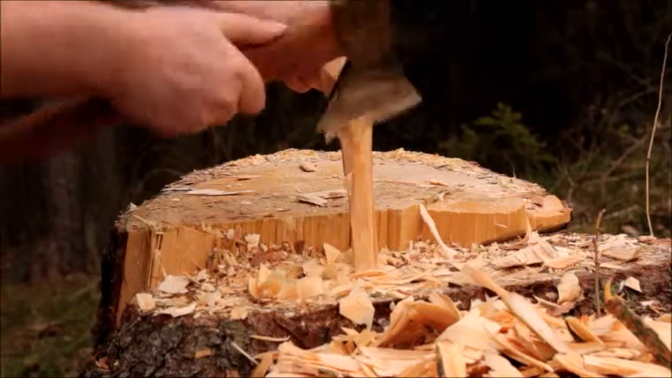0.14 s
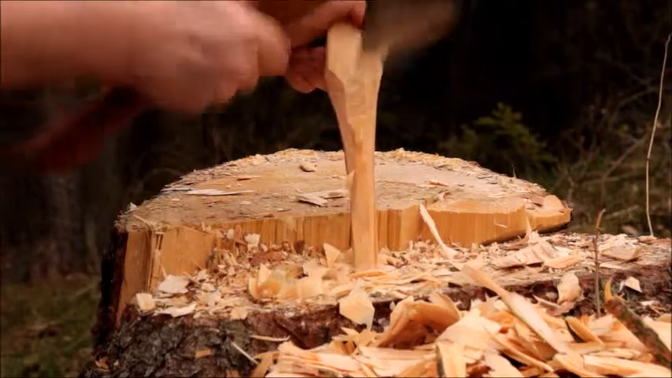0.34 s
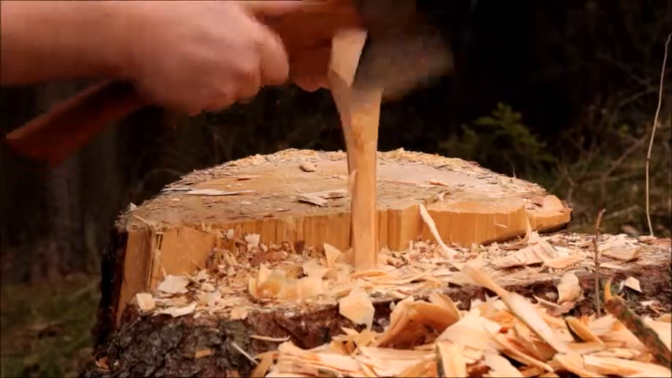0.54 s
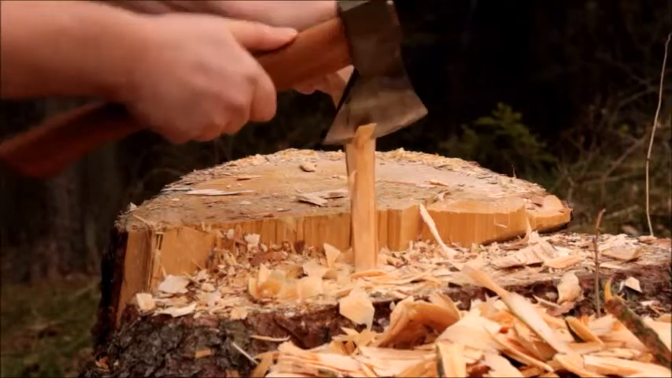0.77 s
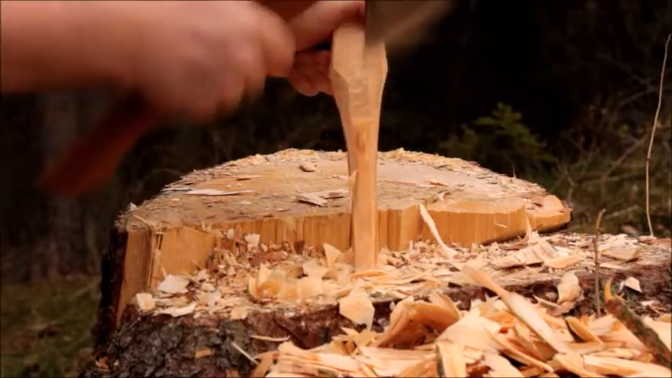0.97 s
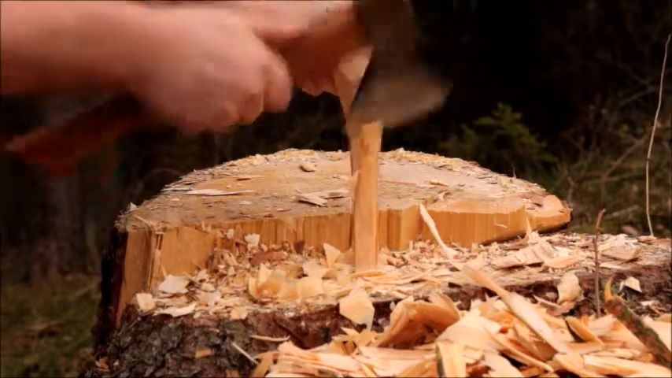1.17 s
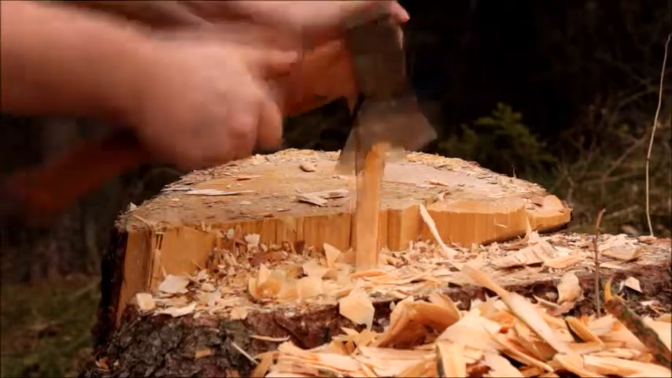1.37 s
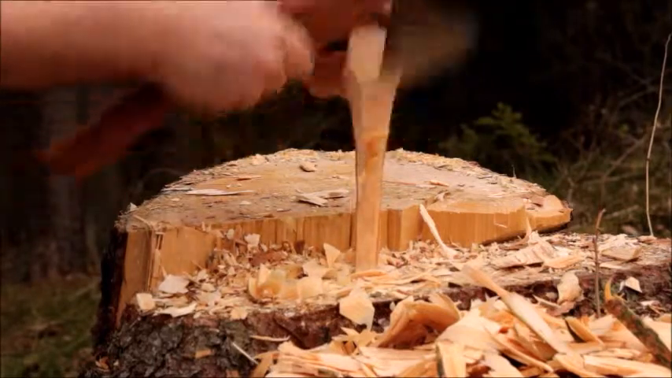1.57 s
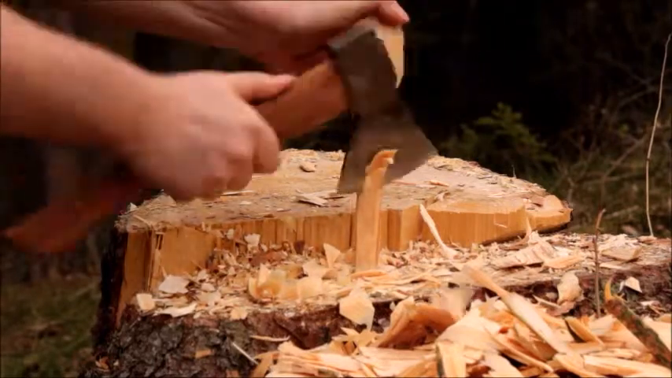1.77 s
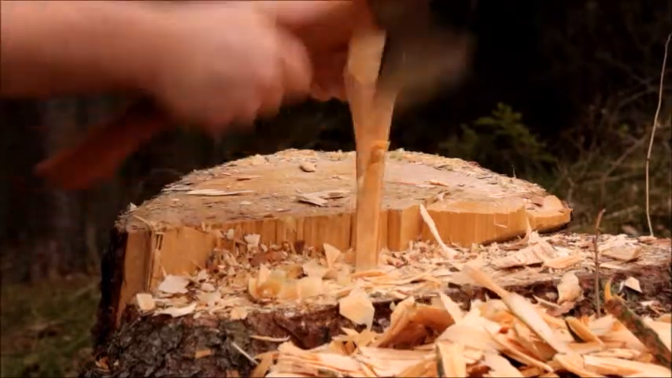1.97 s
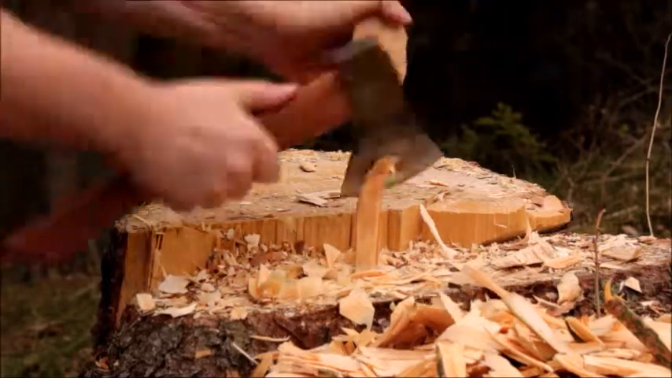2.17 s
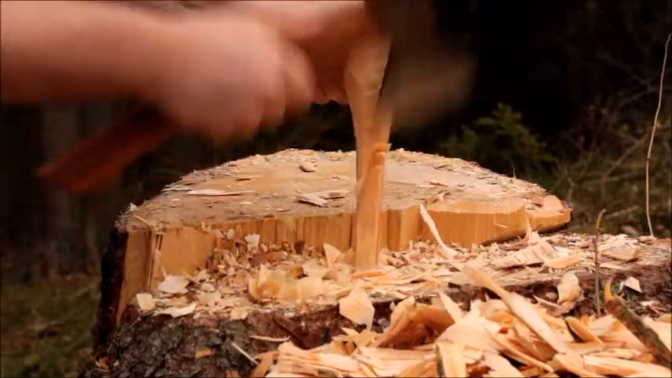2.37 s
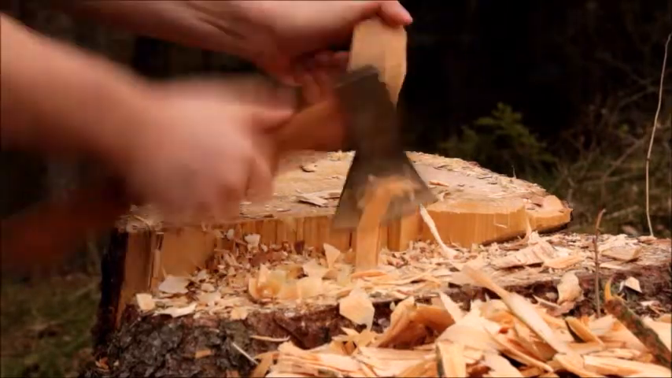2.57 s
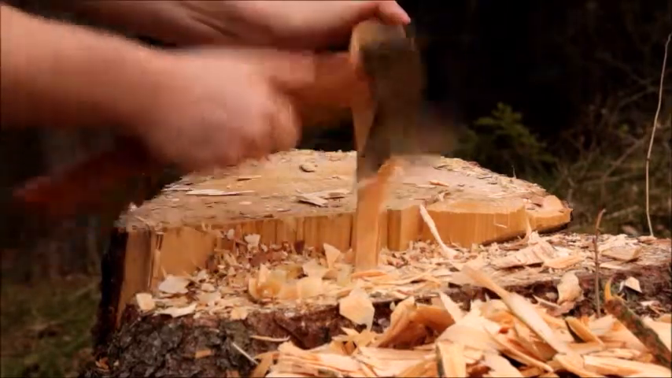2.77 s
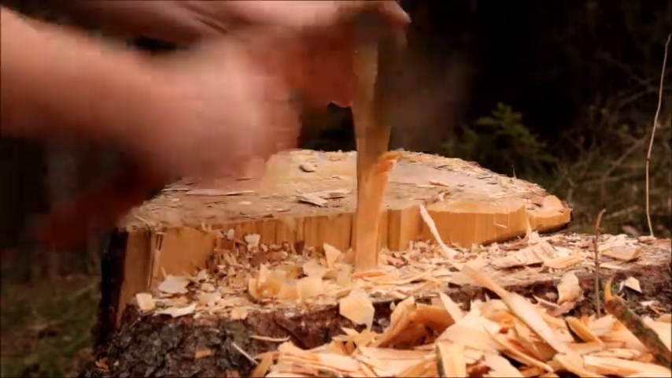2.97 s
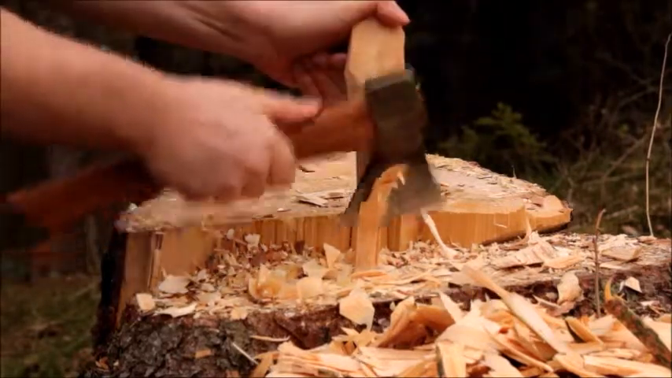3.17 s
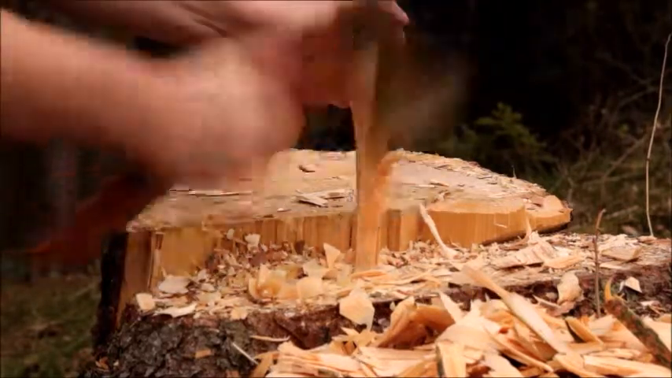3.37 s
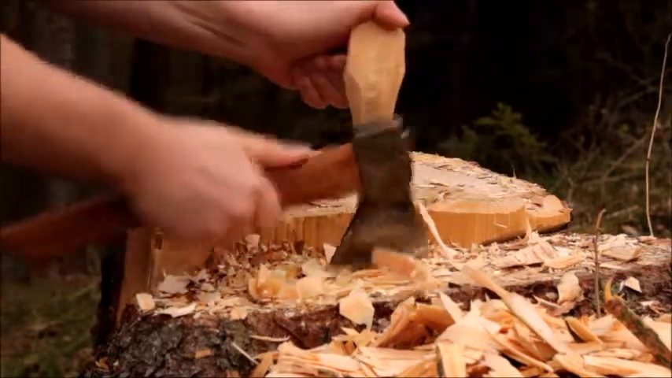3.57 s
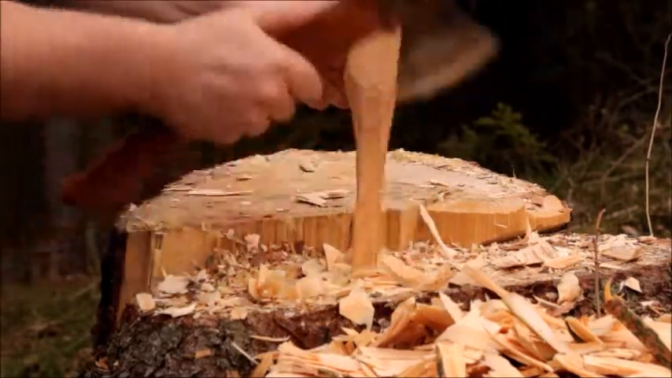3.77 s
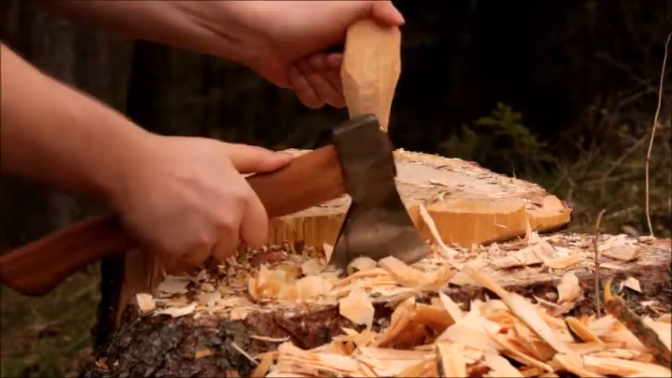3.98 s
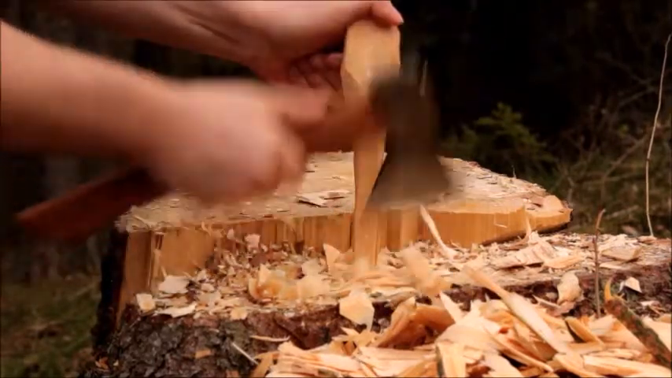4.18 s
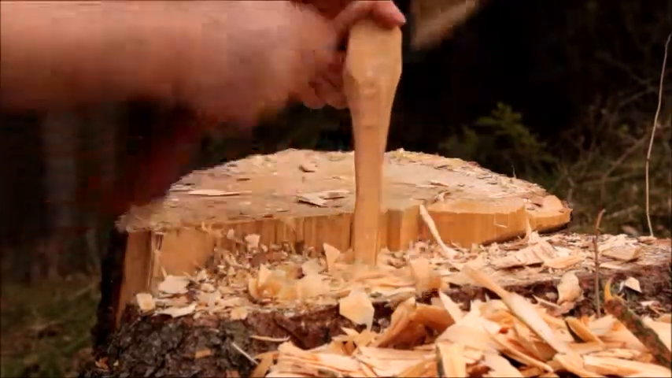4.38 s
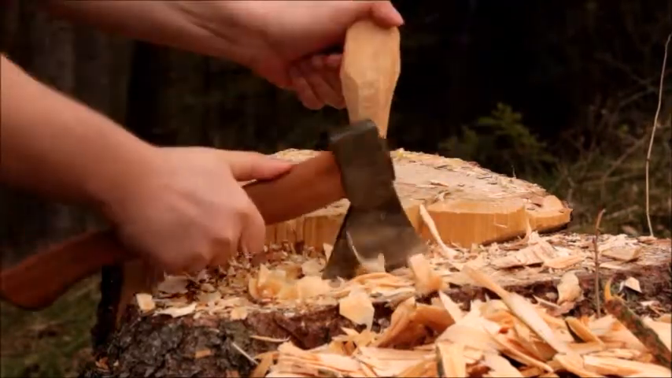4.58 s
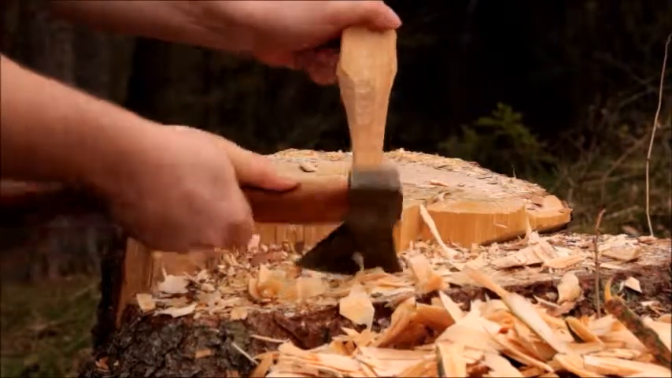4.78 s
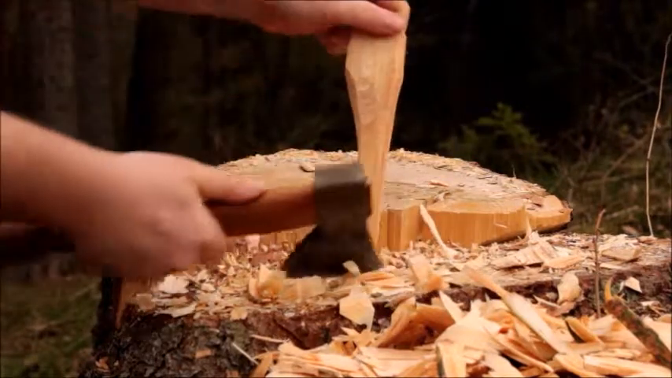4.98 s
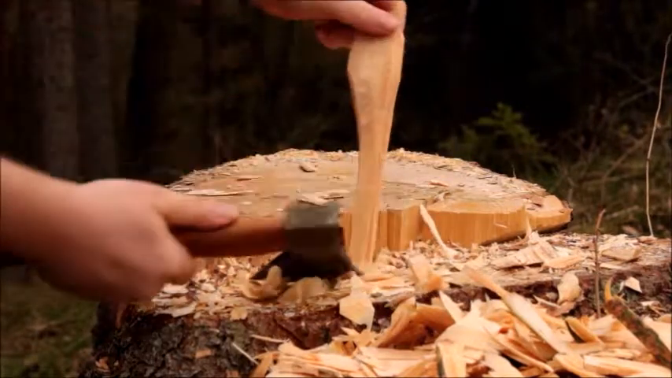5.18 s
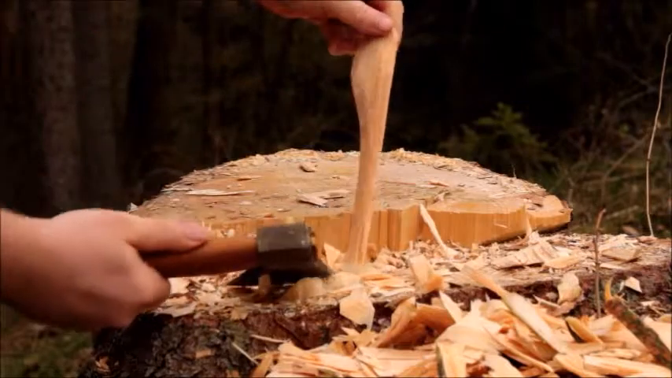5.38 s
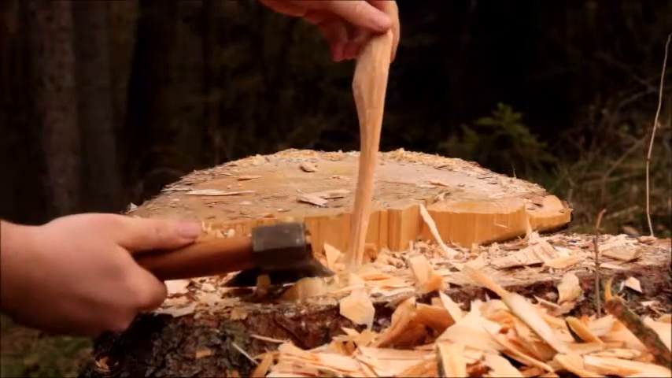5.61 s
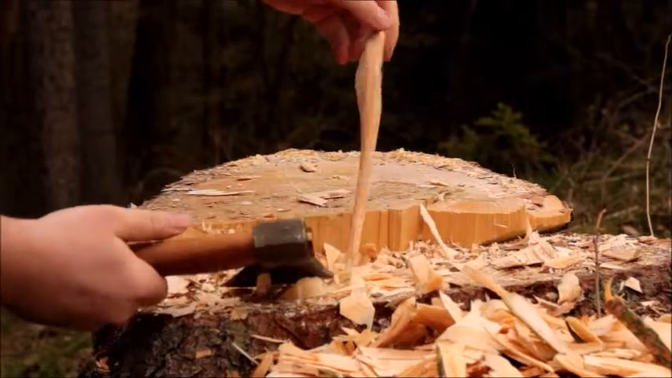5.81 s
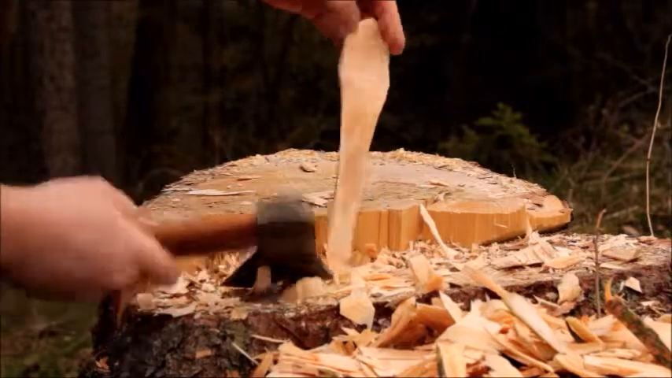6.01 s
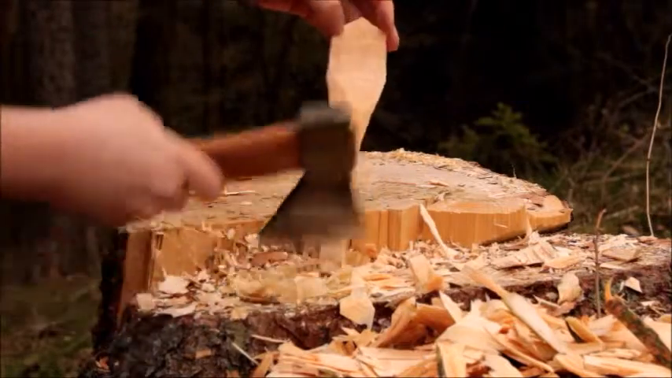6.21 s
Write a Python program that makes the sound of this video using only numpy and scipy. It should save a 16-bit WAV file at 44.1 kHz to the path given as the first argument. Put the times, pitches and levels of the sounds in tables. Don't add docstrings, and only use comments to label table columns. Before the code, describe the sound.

A quiet forest, with soft wind in the crowns, slight microphone hiss and a blurred far bird chorus. Very close and dry, a small axe chops a wooden blank on a stump at roughly 0.1, 0.4, 0.7, 1.1, 1.4, 1.8, 2.2, 2.6, 3.1, 3.5, 4.0 and 4.5 seconds. Early strokes are hollow, bright knocks with short steel rings and a faint woody hum. Fibres tear and chips snap, most sharply near 2.6. From 3.5 the blows gain a lower second knock and a dull stump thud, strongest near 4.0. A tit whistles high alternating rising and falling notes until about 1.6, then again from 4.1 to the end, echoing among trunks. Faint single whistles come from farther birds. Light low wind puffs touch the microphone around 3.7 to 4.9. After the last blow, a thin, high friction whine wavers from 4.9 to 5.5; birdsong and air remain until 6.2, the background briefly thinning at moments.

```python
import sys
import numpy as np
from scipy import signal
from scipy.io import wavfile
from scipy.ndimage import uniform_filter1d, map_coordinates

SR = 44100
rng = np.random.default_rng(int(sys.argv[2]) if len(sys.argv) > 2 else 0)


def invert_db(x):
    u = np.asarray(x, float) / 20
    return 10 ** u


def materialize(psi):
    bounded = np.clip(np.atleast_2d(psi).T, -1, 1)
    quanta = np.round(bounded * 32767).astype(np.int16)
    wavfile.write(sys.argv[1], SR, quanta)


N = 275625

# [t/s, strength/dB]
WIND = [(0, -66.5), (2.6, -66.5), (3.5, -63), (4.2, -65.5), (4.7, -60), (5.3, -68), (6.25, -66)]
# [t/s, level/dB]
CHORUS_BUSY = [(0, -59), (.8, -65.5), (1.35, -64), (1.55, -59.5), (2.2, -58), (2.7, -64.5), (4.5, -66),
               (5.1, -58), (5.6, -63), (6.25, -61)]
# [f/Hz, density/dB]
RUSH_SPECTRUM = [(71, -23), (120, -2), (210, -6), (242, -5), (520, 1), (647, -3), (781, -3), (1310, -8.5),
                 (5000, -25.5), (6500, -54), (11000, -120)]
MIC_SPECTRUM = [(1760, -8), (3000, -1), (3890, -12.5), (4350, -2), (4700, -4.5), (7720, -9.5),
                (16000, -10.5)]
CHORUS_SPECTRUM = [(2200, -31), (3000, -8), (3600, -1), (4500, -8), (5600, -8.5), (7000, -14)]
BUFFET_SPECTRUM = [(15, -6), (40, 10.5), (90, 6.5), (130, -8.5), (200, -19), (400, -37.5)]
# [t/s, peak level/dB, f/Hz]
GUSTS = [
    (3.7, -41.5, 52.8),
    (4.592, -41, 85.7),
    (4.85, -42, 49),
]

# [t/s, peak level/dB, main ring f/Hz, low rings/dB, bright
# rings/dB]
BITES = [(0.1038, -9.5, 1660, -2, -7.5), (0.106, -13.5, 1800, -0.5, -17), (0.436, -9.5, 1680, 1, -19),
         (0.4385, -9, 1750, -11, -35), (0.7425, 3, 1800, -17.5, -12), (0.7426, -9.5, 5500, -33, -28),
         (0.7435, -3.5, 1680, -20, -24), (1.084, 0.5, 1720, -8.5, -16), (1.4244, -12.5, 1720, 3.5, -9),
         (1.7956, -5.5, 1800, -3, -10), (2.2186, -1, 2190, -15.5, -9), (2.2186, -11, 1400, -5, -3),
         (2.6287, -4.5, 2120, -8, -8.5), (3.0651, -2, 2220, -22, -4.5), (3.0645, -4.5, 1324, -16, -10),
         (3.4732, -5.5, 2176, -9.5, -5.5), (3.967, -3.5, 2210, -10, -4), (4.5183, 2, 2190, -18, -12.5),
         (4.52, -21, 2400, -27, 5)]
REBOUNDS = [(0.1207, -15, 1700, -3, -20), (0.1262, -10.5, 1670, -1, -34), (0.4492, -11, 1700, -4, -30),
            (0.7612, -18, 1690, -19, -37), (0.785, -22, 1700, -31, -36.5), (1.0938, -14, 1570, 4.5, -25),
            (1.127, -31, 1830, 1, -19.5), (1.4418, -11.5, 860, 1, -6), (1.8043, -14, 1920, -12.5, -5),
            (2.261, -35, 1500, -16, -26), (2.637, -7, 1300, -11.5, -7), (3.4974, -12.5, 1190, 2.5, -21),
            (3.512, -17.5, 890, -9, -11), (3.989, 3, 920, -13, -28), (3.9902, -9, 3320, -23, -21),
            (4.032, -27.5, 1050, -6, -29), (4.5298, -10, 850, -1, -22), (4.574, -30.5, 1080, 2, -22)]
# [f/Hz, level/dB, t60/s]
CLAP = [(1500, 0, 0.0055), (3160, -3, 0.0019), (5000, -22.5, 0.0048)]
# [f/Hz, level/dB, t60/s]
LOW_RINGS = [(500, -4, 0.0027), (672, -5.5, 0.011), (1080, 10.5, 0.0051), (1300, 0, 0.0053),
             (1570, -28, 0.016)]
UPPER_RINGS = [(2700, -11, 0.004), (3230, 9.5, 0.0033), (4000, -3.5, 0.012), (4760, -2.5, 0.0074),
               (5280, 6, 0.0029)]
HEAD_RINGS = [(6800, -9, 0.012), (7200, -1.5, 0.011), (7940, 0.5, 0.0049), (10230, 0.5, 0.0035),
              (13160, -8, 0.013)]
# [f/Hz, t60/s]
STEEL = [
    (2860, 0.034),
    (5510, .034),
    (7100, 0.036),
]
# [t/s, level of each mode/dB (3 columns), t60 factor]
STEEL_HITS = [(.1045, -30, -32, -37, 1.8), (0.4358, -28, -40, -43, .8), (.7425, -12, -30, -28, 1.3),
              (1.084, -14.5, -44, -44, .9), (1.4245, -32, -36, -40, .7), (1.795, -22, -32, -38, .7),
              (2.2188, -30, -19, -22, .5), (2.63, -28, -34, -42, .6), (3.066, -11, -23, -26, .6),
              (3.4733, -24, -24, -38, .8), (3.9672, -20, -26, -36, .6), (4.5195, -16, -32, -28, .45)]
# [t/s, level/dB, f/Hz, t60/s, swell/s]
ROCKS = [(.7465, -16, 943, 0.025, .001), (.752, -18, 1670, 0.032, .002), (.7592, -8, 1784, .014, .003),
         (1.0985, -27, 1760, 0.029, .002), (1.099, -33, 3200, 0.013, .001),
         (2.2292, -29, 2140, 0.018, .001), (2.2292, -26, 640, 0.015, 0.00087),
         (2.6287, -4, 1300, .008, .0004), (2.2185, 0, 5000, .004, .0002), (2.2185, -5, 5900, .004, .0002),
         (2.2187, 1, 2900, .004, .0003), (2.2187, -3, 1750, .004, .0003), (3.0647, -5, 5050, .005, .0002),
         (3.0647, -6, 3800, .003, .0002), (3.0648, -6, 1700, .004, .0003), (3.4968, -9, 1200, .011, .001),
         (3.4962, -26, 3500, .012, .0005), (4.5312, -9, 1250, .009, .0006), (4.5183, -8, 1500, .005, .0003),
         (4.5183, -14, 4200, .006, .0003), (.7585, -26, 4050, .012, .001),
         (3.4797, -11.5, 3000, 0.011, .0003), (3.9902, 0.5, 1230, 0.0095, 0.00036),
         (3.9906, -8, 4000, 0.0046, 0.00018), (4.5186, -14, 6400, 0.019, 0.00044),
         (4.5315, -18, 3900, .008, 0.00034), (4.5328, -10, 1000, .013, 0.0017),
         (4.539, -26, 2200, 0.022, .001)]

TEAR_STARTS = [.106, .439, .744, 1.085, 1.426, 1.441, 1.806, 2.22, 2.63, 3.066, 3.469, 3.474, 3.968, 4.52,
               4.86]
# [woody level/dB, hiss level/dB, length/s, fade t60/s]
TEARS = [(-41, -41, 0.024, 0.018), (-34.5, -40.5, 0.015, 0.035), (-23, -35.5, 0.0097, 0.062),
         (-24, -37, 0.0068, 0.022), (-34, -58, .014, 0.039), (-29.5, -47, 0.0029, 0.034),
         (-31, -35, 0.0059, 0.034), (-29.5, -32, 0.0033, 0.021), (-31.5, -31, 0.015, 0.086),
         (-35, -35.5, 0.012, 0.022), (-43, -34, 0.0031, 0.0088), (-27, -33, 0.019, 0.067),
         (-31, -31, 0.017, 0.016), (-20.5, -24, 0.0099, 0.034), (-69, -59.5, 0.062, .03)]
# [f/Hz, density/dB]
WOODY_SPECTRUM = [(150, -35), (350, -4.5), (700, 3.5), (1100, 7), (1800, -1.5), (2400, -1), (2950, 1.5),
                  (4500, -11.5), (5600, -32.5), (9000, -42.5)]
TEAR_HISS_SPECTRUM = [(1500, -27), (3000, -5), (6000, -1), (9000, -8), (13000, -15), (16000, -4)]
# [t/s, peak level/dB, f/Hz]
THUDS = [(.107, -28.5, 234), (.445, -41, 91), (2.222, -34.5, 130), (2.632, -35, 131), (3.069, -35, 132),
         (3.479, -28, 150), (3.5, -31, 205), (3.972, -31, 149), (3.992, -22.5, 201), (4.534, -25, 140.3),
         (4.55, -33, 200)]

# [t/s, f/Hz, level/dB]
RISE = [(0, 6600, -24), (.013, 5200, -13), (.028, 4770, -4), (.043, 4770, 1), (.075, 4850, -7),
        (.12, 5020, -5), (.16, 5250, -4), (.176, 5450, -12), (.188, 5750, -26)]
FALL = [(0, 7500, -24), (.012, 7080, -14), (.031, 6250, -7), (.047, 5400, -18), (.066, 4680, 0),
        (.088, 4290, 0), (.13, 3530, -6), (.143, 3280, -12), (.15, 3100, -26)]
PICKUP = [(-.042, 6640, -41), (-.03, 6980, -17.5), (-.012, 7250, -28)]
# [t/s, level/dB, pitch factor, length factor, gain over the note/dB]
RISES = [
    (0.114, -48.5, 1.02, 0.94, 3),
    (0.62, -43, 1, 0.93, -5),
    (1.124, -48, 0.99, 1.0, 4.5),
    (4.317, -48.5, 1.03, 0.95, 2.5),
    (4.819, -43, 1.001, 1.001, 2),
    (5.335, -43, 0.99, 1.06, -10),
]
FALLS = [
    (.39, -44, 0.99, 0.91, 0),
    (0.895, -38.5, 0.99, 0.86, -0.87),
    (1.408, -43.5, 0.96, 0.99, 0),
    (4.073, -52.5, 0.97, 0.73, 0),
    (4.591, -41.5, 0.98, 0.91, 0),
    (5.105, -42, 0.99, 0.97, -1.04),
    (5.609, -42, 1, 0.96, -1.2),
]
# [f/Hz, t60/s]
TREES_T60 = [(300, .25), (1100, 0.408), (1800, 0.8), (2200, .3), (2700, 0.33), (4500, 0.63), (8000, 1),
             (14000, 0.21)]

# [t/s, level/dB]
LINGER = [
    (.125, -50.5),
    (0.451, -51.5),
    (.76, -46),
    (1.095, -45),
]
# [f/Hz, density/dB]
HUM_SPECTRUM = [(1400, -26.5), (1650, -5), (1850, -4), (2150, -23)]
# [t/s, peak level/dB, f/Hz, t60/s]
SNAPS = [(0.127, -11.5, 3250, 0.0078), (0.4529, -14, 4500, 0.0054), (1.0954, -10, 5000, 0.0079),
         (1.4418, -3.5, 5700, 0.006), (1.446, -7.5, 5500, 0.0061), (1.4516, -23, 5150, 0.0066),
         (1.8108, -12, 3120, 0.017), (2.6383, 7, 7600, 0.0037), (2.6388, 0, 7900, 0.0057),
         (2.6443, -15, 9000, .004), (2.6472, 6.5, 13500, 0.0034), (3.079, -14, 3350, 0.0046),
         (3.4801, -5, 7200, 0.0065), (3.4822, -0.5, 6000, 0.0047), (3.974, -21, 3120, 0.01)]
# [t/s, length/s, first f/Hz, last f/Hz, level/dB]
FAR_WHISTLES = [(0.535, 0.74, 7340, 7240, -71), (1.288, 0.19, 3760, 3650, -65),
                (1.449, .24, 3080, 3070, -65.5), (1.716, 0.084, 4300, 5200, -64),
                (1.864, .09, 4200, 3890, -63), (2.424, 0.082, 7000, 5880, -70),
                (2.59, .04, 4950, 4320, -63), (2.966, 0.069, 5100, 4020, -59.5),
                (4.055, 0.036, 4480, 4270, -66), (4.722, 0.3, 2920, 2800, -68),
                (4.196, 0.024, 5430, 5520, -62), (6.05, 0.05, 6470, 3860, -67)]
# [f/Hz, level/dB]
HELD_TONES = [(1250, -48), (1550, -51), (3418, -48), (5518, -51.5), (5927, -49), (6175, -49), (7122, -48.5),
              (7628, -49), (9738, -59), (10040, -49.5), (10761, -49), (15127, -52)]
# [t/s, length/s]
HELD_SPAN = (1.814, 0.032)
# [t/s, f/Hz, level/dB]
SQUEAK = [
    [(4.91, 11975, -82), (4.926, 12078, -62.5), (5.04, 12389, -64), (5.084, 13139, -66.5),
     (5.158, 12086, -67), (5.22, 12188, -60), (5.242, 12097, -74), (5.282, 12543, -65.5),
     (5.34, 12504, -72.5)],
    [(5.36, 11769, -70), (5.37, 11446, -69), (5.392, 11755, -65), (5.512, 10769, -73), (5.53, 10511, -72)],
]

# [lowest f/Hz, list of middles t/s]
THIN_MOMENTS = [(6070, [.032, .781, 2.016, 2.183, 3.656, 4.17]),
                (4500, [2.141, 2.977, 3.249, 4.725, 5.958]),
                (3000, [2.571, 3.741, 3.931, 4.211, 4.252, 4.295, 4.425]),
                (2000, [.37, 0.393, .587, .669, 0.927, 1.014, 1.164, 1.519, 3.765, 5.046, 5.574]),
                (1000, [4.917, 5.6, 5.687, 6.17])]
# [t/s, length/s, lowest f/Hz]
DROUGHTS = [(1.813, 0.019, 700), (2.076, .032, 4500), (2.438, 0.039, 4500), (2.841, 0.03, 1000),
            (3.048, 0.016, 700), (3.413, 0.027, 4000), (4.501, 0.013, 1500), (4.608, 0.029, 3000),
            (5.188, .05, 1000), (5.741, 0.031, 3000), (5.994, 0.025, 4000), (6.062, 0.045, 2000)]
# [t/s, gain/dB, recovery/s]
DUCK = (2.66, -7, 0.16)

RUSH_DB, HISS_DB, CHORUS_DB = -55, -60.5, -63
RUSH_FOLLOWS, CHORUS_GROWS = 0.067, 1.6
BITE_HEAD_DB, REBOUND_HEAD_DB = -8, -15
CLAP_DB_PER_OCTAVE = 9
LEAVES_DB, LEAVES_T60 = -9, .09
FAR_FADE_DB, FAR_BEND = -2.5, 2.8
THIN_S, THIN_LOSS_DB, DROUGHT_LOSS_DB = .013, -16, -32
SURVIVOR_DB = 0
TOP_HZ = 16000


def unit(x):
    return x / np.sqrt(np.mean(x ** 2) + 1e-20)


def along(points, hz):
    f, v = np.transpose(points)
    return np.interp(np.log(hz + 1), np.log(f + 1), v)


def wobble(rate):
    knots = rng.standard_normal(int(N * rate / SR) + 4)
    return map_coordinates(knots, [np.arange(N) * rate / SR])


def add(track, s, piece):
    part = track[round(s * SR):][:len(piece)]
    part += piece[:len(part)]


def noise(spectrum, patchy_db):
    hz, _, z = signal.stft(rng.standard_normal(N), SR, nperseg=1024)
    field = uniform_filter1d(rng.standard_normal(z.shape), 10, 0)
    field = uniform_filter1d(field, 6, 1)
    points = [(0.62, -120)] + list(spectrum) + [(SR / 2, -120)]
    shape = along(points, hz)[:, None]
    z = z * invert_db(shape + patchy_db * unit(field))
    return unit(signal.istft(z, SR, nperseg=1024)[1][:N])


def whistle(rows, flutter_db):
    s, hz, db = np.transpose(rows)
    t = np.arange(s[0], s[-1], 1 / SR)
    flutter = np.interp(t, np.linspace(s[0], s[-1], 40), rng.standard_normal(40))
    edge = np.clip(np.minimum(t - s[0], s[-1] - t) / 0.0019, 0, 1)
    level = invert_db(np.interp(t, s, db) + 6.0 + flutter_db * flutter)
    phase = 2 * np.pi * np.cumsum(np.interp(t, s, hz)) / SR
    return edge * level * np.sin(phase)


def air():
    t = np.arange(N) / SR
    wind_db = np.interp(t, *np.transpose(WIND))
    busy_db = np.interp(t, *np.transpose(CHORUS_BUSY))
    rush_db = RUSH_DB + RUSH_FOLLOWS * (wind_db - wind_db.mean()) + 0.26 * wobble(7.4)
    out = invert_db(rush_db) * noise(RUSH_SPECTRUM, patchy_db=2.0)
    out += invert_db(HISS_DB + 1.19 * wobble(2.8)) * noise(MIC_SPECTRUM, patchy_db=-0.2)
    chorus_db = CHORUS_DB + CHORUS_GROWS * (busy_db - busy_db.mean()) + 1.2 * wobble(4)
    out += invert_db(chorus_db) * noise(CHORUS_SPECTRUM, patchy_db=3.0)
    lumps = invert_db(2.0 * wobble(6.6)) * noise(BUFFET_SPECTRUM, patchy_db=1.0)
    out += invert_db(wind_db + 3.5) * unit(lumps)
    return out + puffs(GUSTS)


def knocks():
    out, t = np.zeros(N), np.arange(SR // 16) / SR
    contacts = [row + (BITE_HEAD_DB,) for row in BITES]
    contacts += [row + (REBOUND_HEAD_DB,) for row in REBOUNDS]
    luck = rng.standard_normal((len(contacts), 2, 19))
    for (s, db, main_hz, low_db, bright_db, head_db), (level, pitch) in zip(contacts, luck):
        modes = [(main_hz, 0, .012 if main_hz < 4000 else .04)]
        clap_db = CLAP_DB_PER_OCTAVE * np.log2(min(main_hz, 2000) / 2000)
        families = ((CLAP, clap_db), (LOW_RINGS, low_db), (UPPER_RINGS, bright_db),
                    (HEAD_RINGS, bright_db + head_db))
        for family, gain_db in families:
            modes += [(hz, d + gain_db, t60) for hz, d, t60 in family]
        hz, d, t60 = np.transpose(modes)[:, :, None]
        hz = hz * (1 + .012 * pitch[:, None] * (hz != main_hz))
        ring = invert_db(d + 2.5 * level[:, None] - 60 * t / t60) * np.sin(2 * np.pi * hz * t)
        attack = 1.0 / main_hz * invert_db(-.3 * db)
        add(out, s, -invert_db(db - 0.5) * ring.sum(0) * (1 - np.exp(-t / attack)))
    return signal.sosfilt(signal.butter(2, 260, "high", fs=SR, output="sos"), out)


def rings():
    out, t = np.zeros(N), np.arange(SR // 16) / SR
    rows = []
    for s, *levels, free in STEEL_HITS:
        rows += [(s, db, hz, free * t60, .0005) for db, (hz, t60) in zip(levels, STEEL)]
    for s, db, hz, t60, swell in rows + ROCKS:
        level = invert_db(db - 60 * t / t60) * (1 - np.exp(-t / swell))
        add(out, s, -level * np.sin(2 * np.pi * hz * t))
    return out


def tears():
    woody, hiss, t = np.zeros(N), np.zeros(N), np.arange(SR // 6) / SR
    for s, (woody_db, hiss_db, length, t60) in zip(TEAR_STARTS, TEARS):
        shape = invert_db(-60 * np.maximum(t - length, 0) / t60) * np.clip(t / .001, 0, 1)
        add(woody, s, invert_db(woody_db) * shape)
        add(hiss, s, invert_db(hiss_db) * shape)
    grain = unit(invert_db(4 * wobble(900)))
    woody = woody * noise(WOODY_SPECTRUM, patchy_db=2.5)
    return woody + hiss * grain * noise(TEAR_HISS_SPECTRUM, patchy_db=3.0)


def puffs(rows):
    out = np.zeros(N)
    for s, db, hz in rows:
        u = np.linspace(-3, 3, int(1.2 * SR / hz))
        add(out, s - .6 / hz, invert_db(db) * (1 - u * u) * np.exp(-u * u / 2))
    return out


def tit():
    out = np.zeros(N)
    for note, sung in ((RISE, RISES), (FALL, FALLS), (PICKUP, FALLS)):
        for s, db, pitch, length, gained_db in sung:
            rows = np.array(note) * [length, pitch, 1] + [s, 0, db]
            rows[:, 2] += gained_db * (rows[:, 0] - s) / 0.16
            add(out, rows[0, 0], whistle(rows, flutter_db=2.0))
    return out


def leaves(x):
    t = np.arange(SR // 12) / SR
    tail = invert_db(-60 * t / LEAVES_T60) * rng.standard_normal(len(t)) * (t > .003)
    return invert_db(LEAVES_DB) * signal.fftconvolve(x, tail / np.linalg.norm(tail))[:N]


def trees(x):
    out, step = np.zeros(N), SR // 4
    for i in range(0, N, step):
        hz, t, z = signal.stft(rng.standard_normal(SR // 2), SR, nperseg=256)
        decay = invert_db(-60 * t / along(TREES_T60, hz)[:, None])
        tail = signal.istft(z * decay, SR, nperseg=256)[1]
        add(out, i / SR + 0.013, signal.fftconvolve(x[i:i + step], tail / np.linalg.norm(tail)))
    return out


def lingering():
    level, t = np.zeros(N), np.arange(SR // 3) / SR
    for s, db in LINGER:
        add(level, s, invert_db(db - 60 * t / 0.32))
    return level * noise(HUM_SPECTRUM, patchy_db=2.5)


def snaps():
    out, t = np.zeros(N), np.arange(SR // 30) / SR
    for (s, db, hz, t60), hiss in zip(SNAPS, rng.standard_normal((len(SNAPS), len(t)))):
        crack = np.sin(2 * np.pi * hz * t) + 0.78 * np.diff(hiss, prepend=0)
        add(out, s, invert_db(db - 9 - 60 * t / max(t60, .001)) * crack)
    return out


def far_birds():
    out, u = np.zeros(N), np.linspace(0, 1, 9)
    for s, length, first_hz, last_hz, db in FAR_WHISTLES:
        hz = last_hz + (first_hz - last_hz) * (1 - u) ** FAR_BEND
        level_db = db + FAR_FADE_DB * (2 * u - 1) ** 4
        rows = np.transpose([s + length * u, hz, level_db])
        add(out, s, whistle(rows, flutter_db=5.5))
    return out


def held_tones():
    out, (s, length) = np.zeros(N), HELD_SPAN
    t = np.arange(int(length * SR)) / SR
    hz, db = np.transpose(HELD_TONES)[:, :, None]
    tones = invert_db(db + 14.5 - 60 * t / 0.098) * np.sin(2 * np.pi * (hz * t + rng.random(hz.shape)))
    add(out, s, tones.sum(0) * np.clip(np.minimum(t, length - t) / 0.0035, 0, 1))
    return out


def squeak():
    out = np.zeros(N)
    for rows in SQUEAK:
        rows = np.array(rows) - [0, 0, 4]
        add(out, rows[0][0], whistle(rows, flutter_db=2.0))
        upper = rows * [1, 1.225, 1] + [0, 0, -1.5]
        add(out, rows[0][0], whistle(upper, flutter_db=6))
    return out


def scene():
    axe = knocks() + snaps() + tears() + puffs(THUDS) + rings()
    song, far = tit(), far_birds()
    echo = trees(invert_db(-36) * axe + invert_db(-7) * song + invert_db(-14) * far)
    return (axe + song + far + squeak() + echo + air() + lingering() + leaves(song))[None]


def thin_out(x, keep_db, rise_db, strong_db):
    hz, t, z = signal.stft(x, SR, nperseg=512, noverlap=448)
    loss_db = np.zeros(z.shape)
    now_db = 20 * np.log10(np.abs(z) + 1e-10)
    faint = now_db - uniform_filter1d(now_db, size=31, axis=0) < strong_db
    spans = [(s - THIN_S / 2, THIN_S, above_hz, THIN_LOSS_DB)
             for above_hz, middles in THIN_MOMENTS for s in middles]
    spans += [row + (DROUGHT_LOSS_DB,) for row in DROUGHTS]
    for s, length, above_hz, db in spans:
        near = (t > s - THIN_S) & (t < s + length + THIN_S)
        inside = (t > s) & (t < s + length)
        level_db = 10 * np.log10(np.mean(np.abs(z[:, inside]) ** 2, 1) + 1e-20)
        above_db = level_db - uniform_filter1d(level_db, size=15)
        weak = (above_db < keep_db + rise_db * np.log2(hz / 3000 + .1))[:, None]
        during = np.clip(np.minimum(t - s, s + length - t)[near] / 0.0021 + 0.5, 0, 1)
        reach = np.clip(hz / above_hz * 4 - 2.4, 0, 1)[:, None]
        loss_db[:, near] += during * reach * faint[:, near] * np.where(weak, db, SURVIVOR_DB)
    z = z * invert_db(loss_db) * (hz < TOP_HZ)[:, None]
    return signal.istft(z, SR, nperseg=512, noverlap=448)[1][:N]


def top_cut(x):
    return signal.sosfilt(signal.butter(12, 16510, fs=SR, output="sos"), x)


def record(dry):
    s, db, recovery = DUCK
    since = np.arange(N) / SR - s
    gain = invert_db(db * (since > 0) * np.exp(-np.abs(since) / recovery))
    limited = np.clip(gain * dry[0], -1.05, 1.05)
    thinned = thin_out(limited, keep_db=0.0, rise_db=2.0, strong_db=11)
    mix = (thinned + held_tones())[None] + 0.00094
    return top_cut(mix)


dry = scene()
out = record(dry)
materialize(out)
```